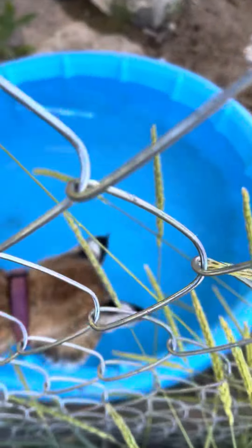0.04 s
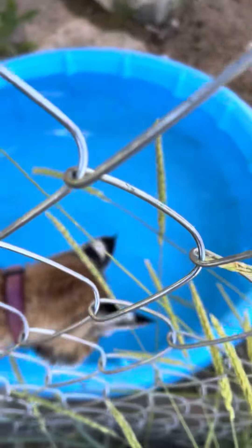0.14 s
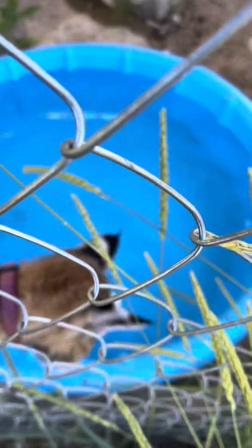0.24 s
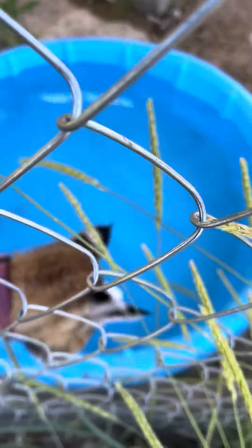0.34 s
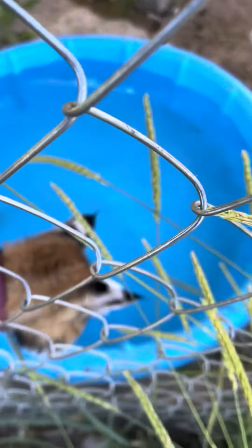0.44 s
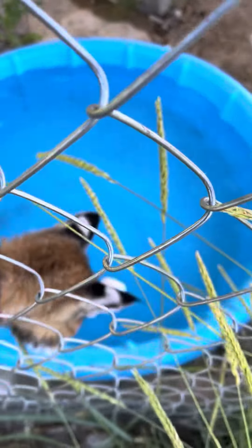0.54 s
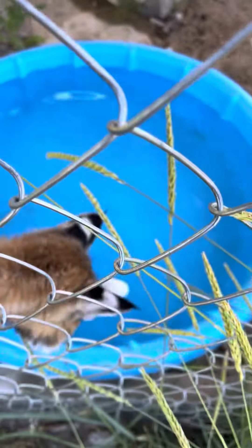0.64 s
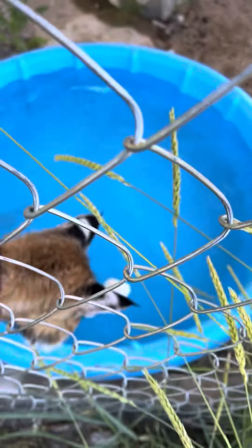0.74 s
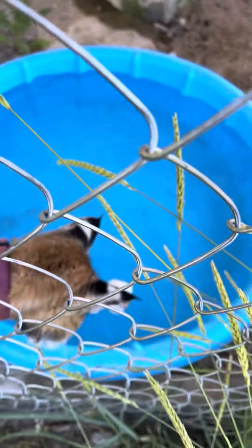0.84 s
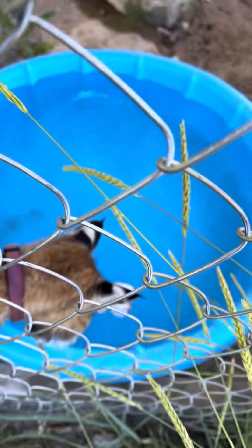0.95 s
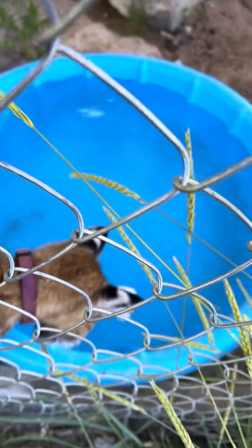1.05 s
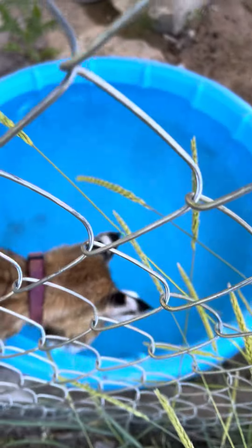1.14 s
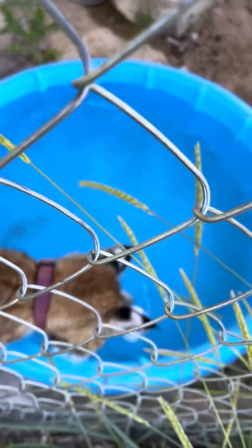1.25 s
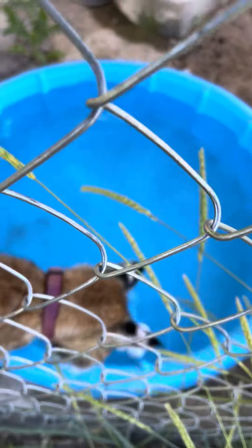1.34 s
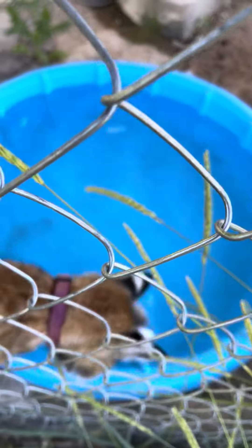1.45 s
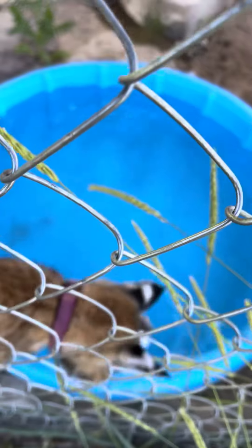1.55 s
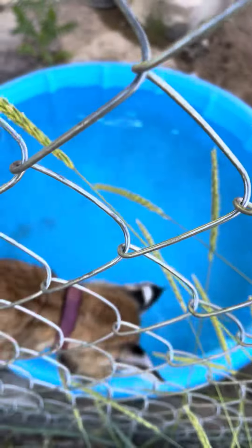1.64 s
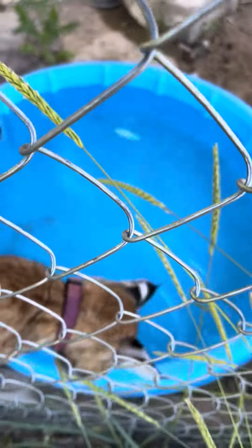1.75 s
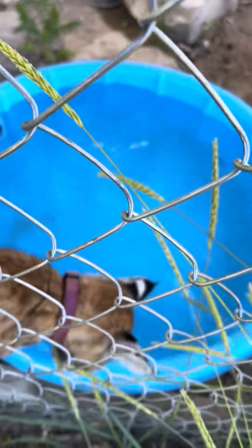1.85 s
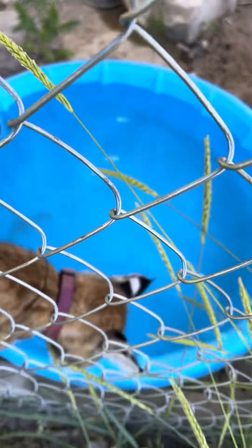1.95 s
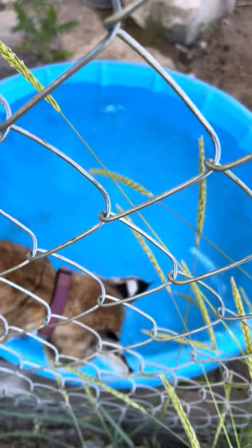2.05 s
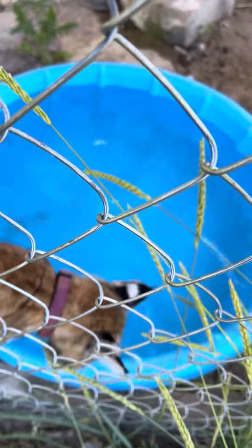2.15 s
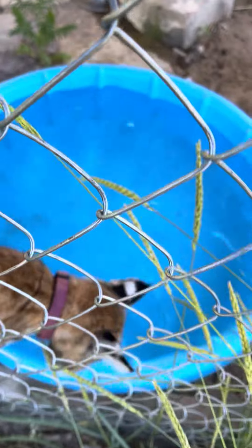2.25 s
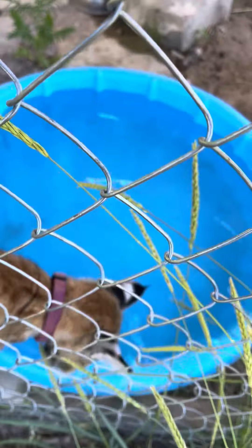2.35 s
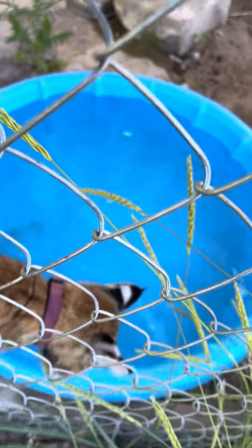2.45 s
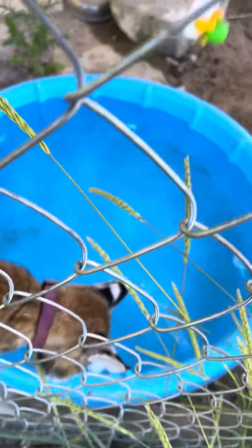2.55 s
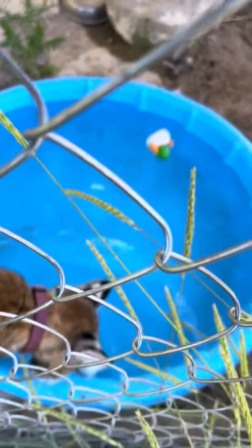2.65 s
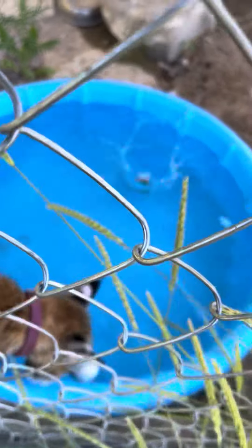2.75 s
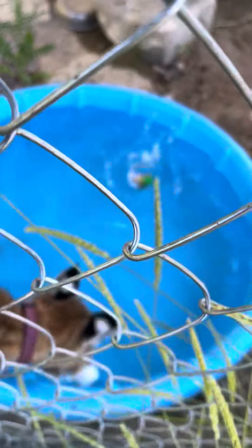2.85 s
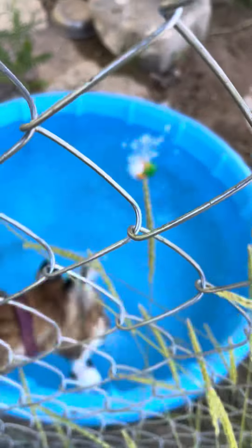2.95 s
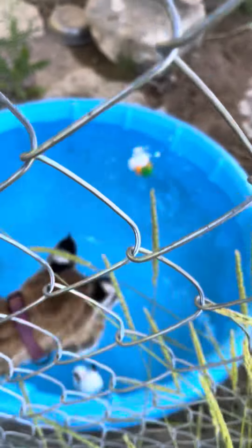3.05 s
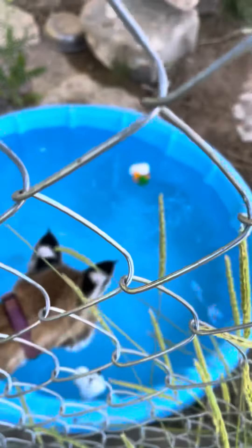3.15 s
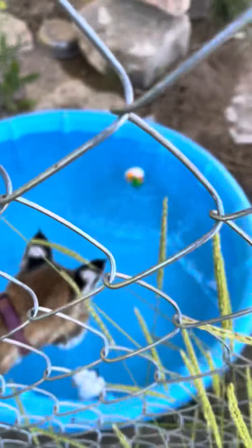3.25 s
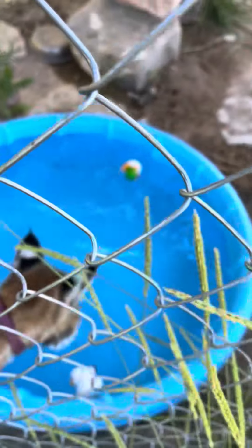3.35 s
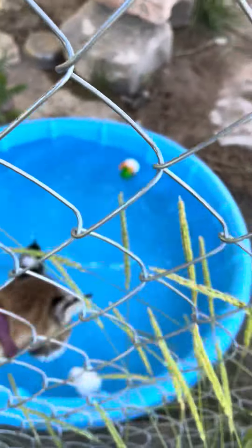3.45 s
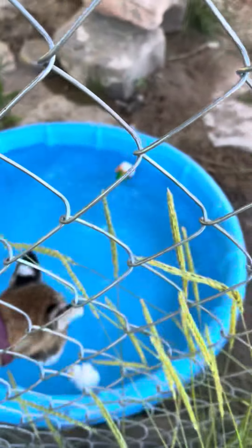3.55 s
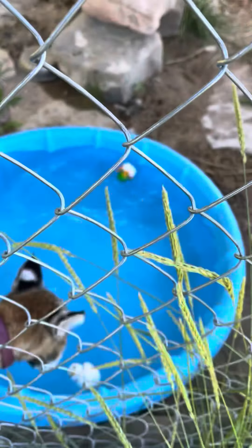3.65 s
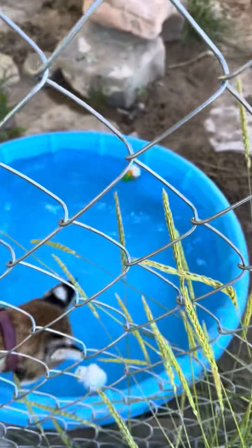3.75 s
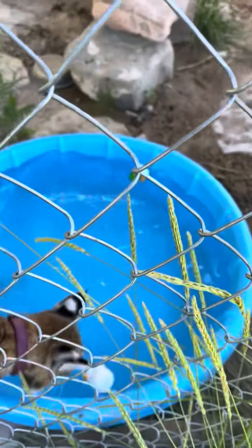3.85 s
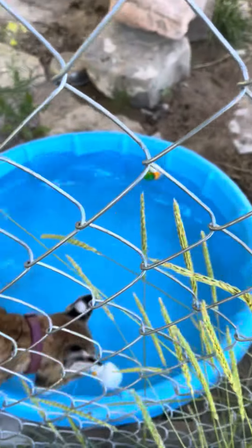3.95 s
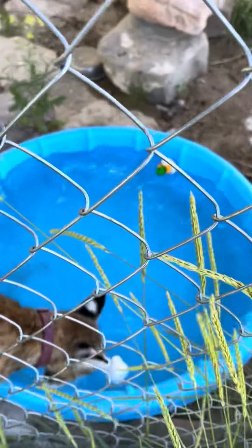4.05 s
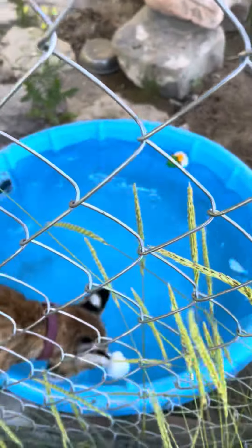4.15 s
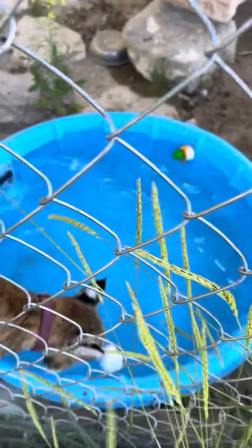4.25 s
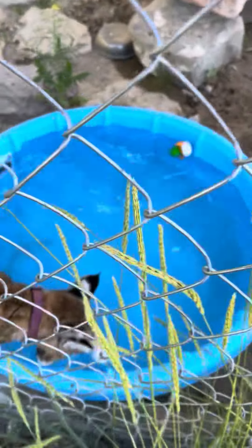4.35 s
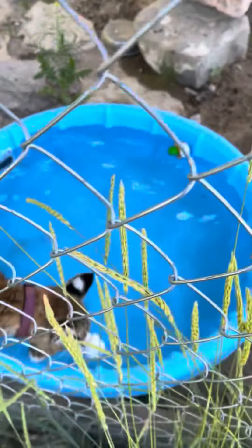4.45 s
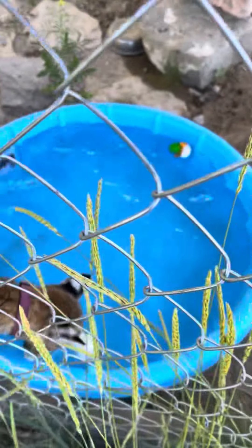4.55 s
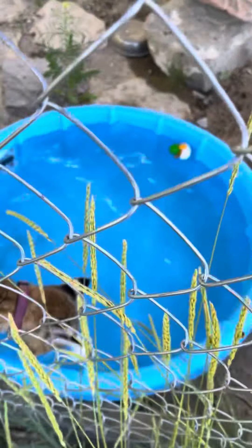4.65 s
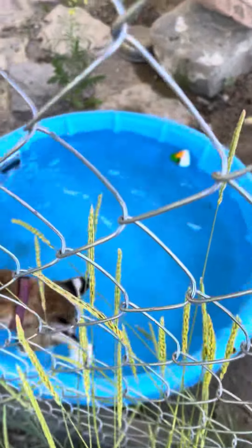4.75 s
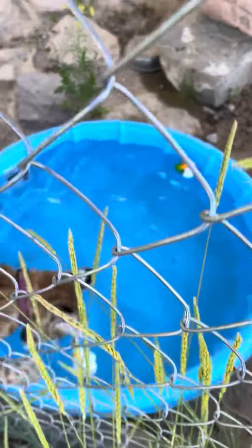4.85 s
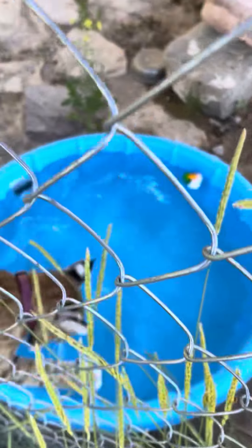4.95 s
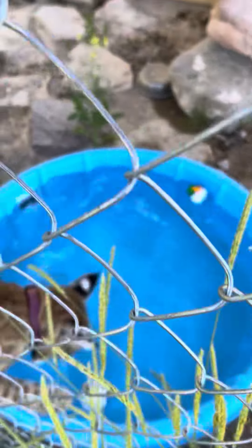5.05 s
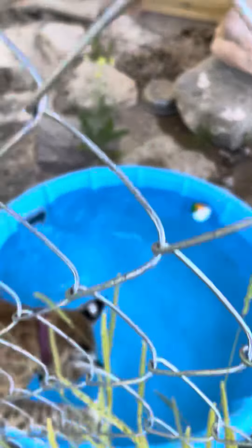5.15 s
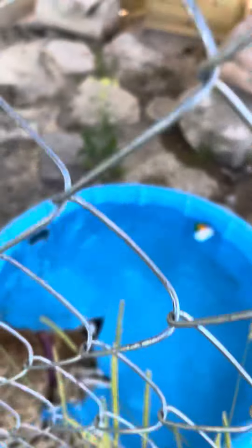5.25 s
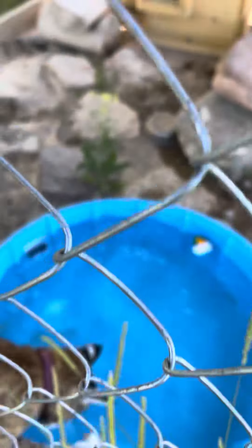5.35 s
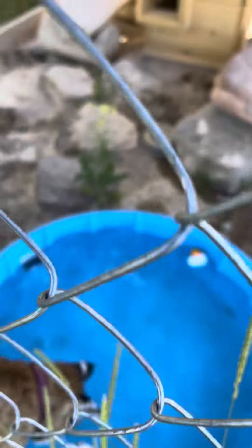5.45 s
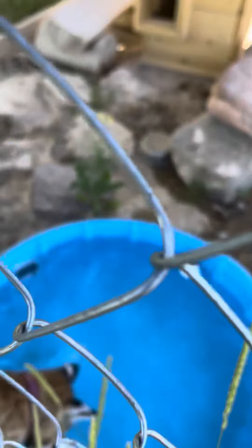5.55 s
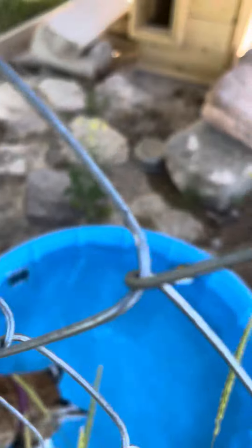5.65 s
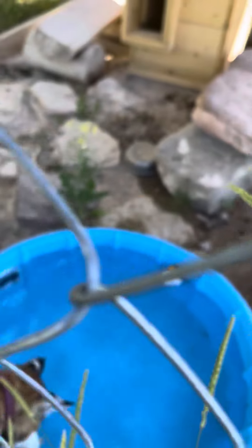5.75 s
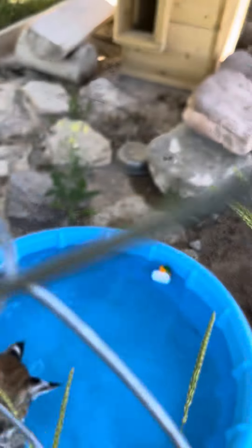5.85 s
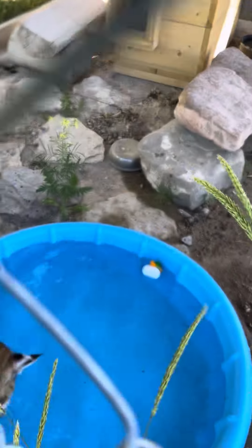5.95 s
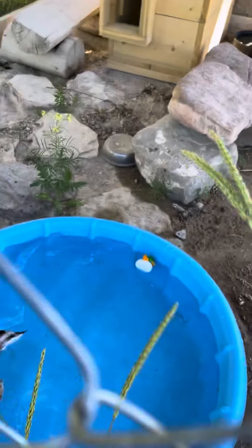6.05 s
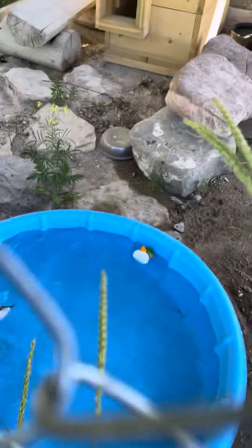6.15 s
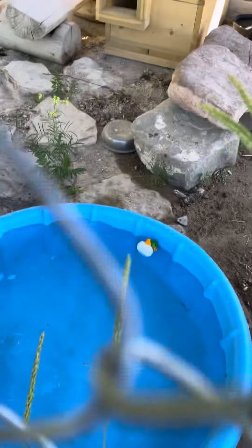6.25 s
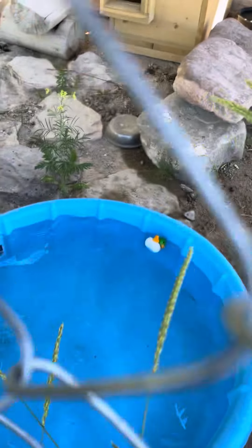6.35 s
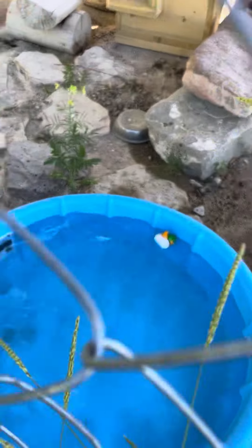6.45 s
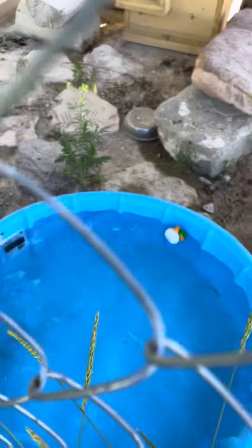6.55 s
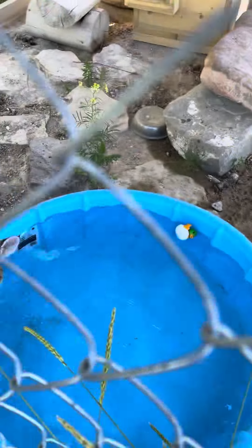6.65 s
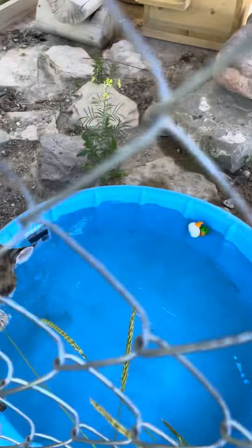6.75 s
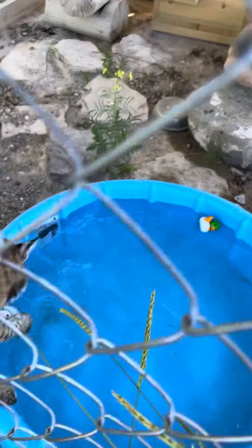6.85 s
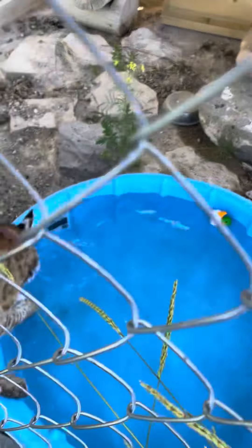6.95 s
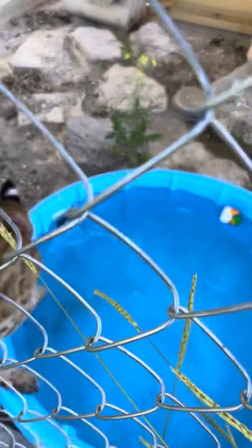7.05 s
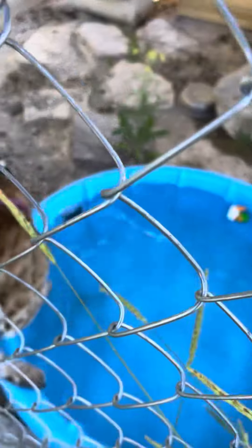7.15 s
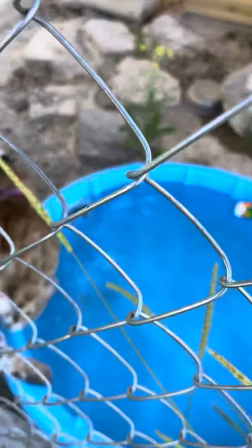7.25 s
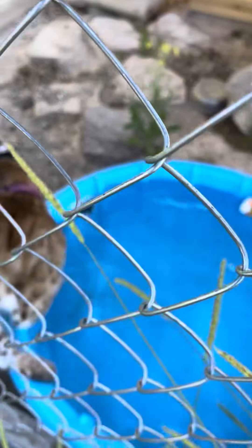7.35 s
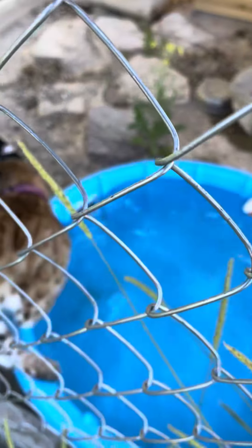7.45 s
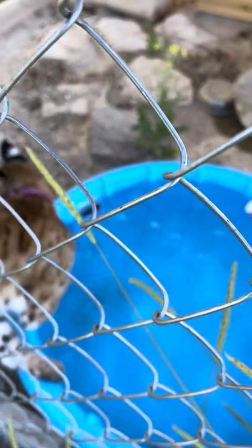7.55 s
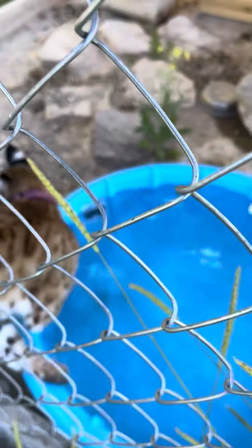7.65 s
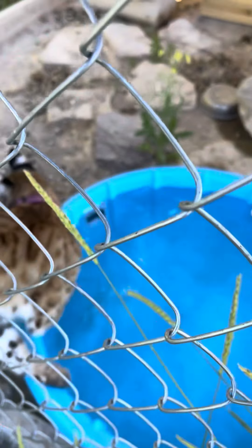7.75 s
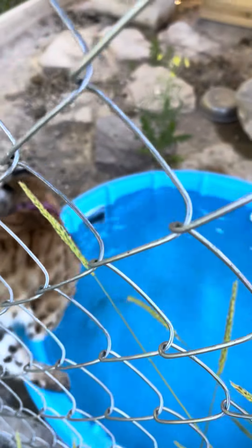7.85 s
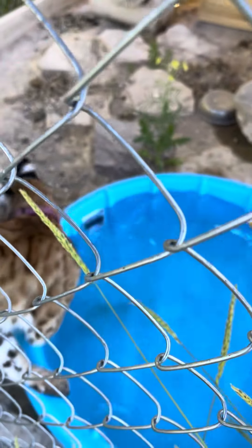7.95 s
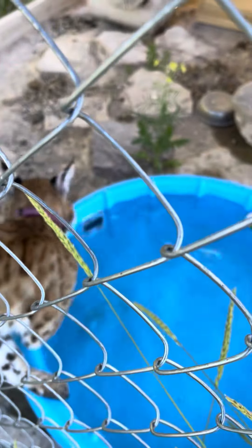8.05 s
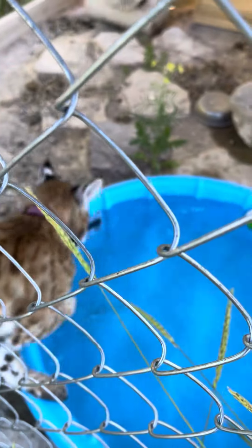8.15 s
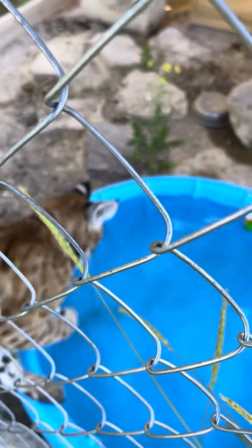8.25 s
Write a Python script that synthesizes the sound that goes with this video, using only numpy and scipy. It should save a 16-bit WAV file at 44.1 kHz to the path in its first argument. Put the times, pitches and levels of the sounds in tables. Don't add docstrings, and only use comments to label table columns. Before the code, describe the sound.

An animal's paws thump and splash unevenly in a shallow plastic tub, with one sharp knock on the water, over faint breeze and rumble.

```python
import sys
import numpy as np
from scipy import signal
from scipy.fft import rfft, irfft, next_fast_len
from scipy.io import wavfile
from scipy.ndimage import uniform_filter1d

SR = 44100
rng = np.random.default_rng(int(sys.argv[2]) if len(sys.argv) > 2 else 0)


def gain_from_decibels(decibels):
    exponent = np.asarray(decibels, float) / 20
    return 10 ** exponent


def to_wav(sig):
    pcm = np.clip(np.atleast_2d(sig), -1, 1) * 32767
    pcm = np.round(pcm).astype(np.int16)
    wavfile.write(sys.argv[1], SR, pcm.T)


N = 365588
TIME = np.arange(N) / SR


def rms_one(x):
    return x / np.sqrt(np.mean(x ** 2) + 1e-20)


def in_time(rows):
    s, db = np.transpose(rows)
    return np.interp(TIME, s, db)


def at_hz(points, hz):
    known_hz, db = np.transpose(points)
    return np.interp(np.log(hz), np.log(known_hz), db)


def drift(rate):
    r = np.exp(-80 * np.pi * rate / SR)
    white = rng.standard_normal(len(TIME[::40]) + 2000)
    settled = signal.lfilter([1], [1, -2 * r, r * r], white)[2000:]
    return rms_one(settled)


def band(x, low_hz, high_hz):
    return signal.sosfilt(signal.butter(2, [low_hz, high_hz], "band", fs=SR, output="sos"), x)


def resonate(x, hz, width):
    r = np.exp(-np.pi * width / SR)
    poles = [1, -2 * r * np.cos(2 * np.pi * hz / SR), r * r]
    return signal.lfilter(np.array([1, 0, -1]) * (1 - r * r) / 2, poles, x)


def add(out, s, piece):
    i = round(s * SR)
    out[i:i + len(piece)] += piece[:N - i]


def swell(s, hold, rise, fall):
    rising = 1 + (TIME - s) / rise
    falling = 1 + (s + hold - TIME) / fall
    return np.clip(np.minimum(rising, falling), 0, 1)


def bursts(times, db, t60, rise):
    out, t = np.zeros(N), TIME[:SR // 3]
    for s, level, long in zip(times, db, t60):
        add(out, s, gain_from_decibels(level - 60 * t / long) * (1 - np.exp(-t / rise)))
    return out


def bubble(hz, t60, climb):
    t = TIME[:round(t60 * SR)]
    ring = np.sin(2 * np.pi * hz * (t + climb * t * t / t60))
    return ring * gain_from_decibels(-60 * t / t60) * (1 - np.exp(-t * hz))


def banded_noise(spectrum, patchy_db, count, bright_db=0, dull_db=0):
    out, together = 0, drift(15.0) + 0.096 * drift(87.0)
    first_hz, last_hz = spectrum[0][0], spectrum[-1][0]
    edges = first_hz * 2 ** np.arange(0, np.log2(last_hz / first_hz) + .1, 1 / count)
    white = rng.standard_normal((2, 2, N))
    for k, (low, high) in enumerate(zip(edges, edges[1:])):
        hz = np.sqrt(low * high)
        tilt = np.log2(hz / 6000)
        lift = bright_db * np.clip(1.57 * tilt, 0, 1.6) + dull_db * np.clip(-1.4 * tilt, 0, 1)
        flicker_db = patchy_db * np.clip(1 - 0.48 * tilt, .5, .7) * (0.58 * together + drift(7.6))
        gain = gain_from_decibels(at_hz(spectrum, hz) + lift + flicker_db)
        out = out + np.interp(TIME, TIME[::40], gain) * band(white[k % 2], low, high)
    return out


def rumble():
    # (frequency [Hz], density [dB per Hz])
    rumble_spectrum = [(25, -25), (40, -8.5), (60, 1.5), (100, -5), (150, -8), (250, -26)]
    # (time [s], level [dB])
    far_level = [(0, -62), (0.4, -61.5), (1.2, -68.5), (2.9, -63), (3.5, -67), (4.45, -67), (5.5, -67),
                 (5.95, -74), (6.2, -57.5), (6.5, -65), (7.4, -70.5), (8.29, -70)]
    return gain_from_decibels(in_time(far_level) + 28.0) * banded_noise(rumble_spectrum, 2.8, count=2)


def lapping():
    # (frequency [Hz], density [dB per Hz])
    murmur_spectrum = [(70, -19), (130, -9), (250, -0.5), (450, -4), (800, -13.5), (1300, -19.5),
                       (2000, -36)]
    # (time [s], level [dB])
    wave_level = [(0, -61.5), (0.4, -67.5), (0.8, -57), (1.2, -71.5), (1.5, -57.5), (2.1, -61), (2.3, -62),
                  (2.6, -57.5), (4.0, -62.5), (4.4, -67), (4.7, -61), (5.5, -63), (5.75, -72), (6.2, -62),
                  (6.8, -62.5), (7.4, -72), (7.8, -72), (8.29, -64)]
    return gain_from_decibels(in_time(wave_level) + 16.5) * banded_noise(murmur_spectrum, 3.03, count=2)


def grass():
    # (frequency [Hz], density [dB per Hz])
    rustle_spectrum = [(500, -10.5), (1200, -8), (1700, -6), (2500, -5), (3600, -7), (4800, -3.5),
                       (6200, 1.5), (7400, -0.5), (9000, 3), (10500, 7.5), (12000, -11.5), (14000, -25.5),
                       (16000, -35.5)]
    # (time [s], hold [s], strength [dB], extra weight near 2 kHz [dB])
    gust_rows = [(0.173, 0.28, -6.5, -4), (0.733, 0.022, 2.5, 4.5), (1.582, 0.18, 6.5, 3.5),
                 (2.33, 0.89, 2, 5), (2.735, 0.55, 12.5, 3), (3.405, 0.095, 6, 5.5), (3.666, 0.38, 16.5, 7),
                 (4.44, 0.093, 6.5, -1.5), (4.159, 0.17, 11, 4.5), (4.603, 0.028, 5.5, 5.5),
                 (4.767, 0.19, 15.5, 8.5), (5.282, 0.018, -8.5, 7.5), (5.533, 0.051, 1.5, 3),
                 (6.046, 0.21, 16, 9.5), (6.345, 0.054, 13.5, 0), (6.504, 0.088, 14, 7.5),
                 (6.804, 0.09, 5, 5.5)]
    shapes = np.array([swell(s, hold, rise=0.22, fall=0.1) for s, hold, *_ in gust_rows])
    strength_db, extra_db = np.transpose(gust_rows)[2:]
    gust_db = (shapes * strength_db[:, None]).max(axis=0)
    weight_db = extra_db @ shapes
    rustle_db = -68.5 - 0.56 * TIME + 0.36 * gust_db
    bright_db = 0.88 * gust_db[::40] - 7.0
    colour = banded_noise(rustle_spectrum, 3.55, count=3, bright_db=bright_db, dull_db=weight_db[::40])
    return gain_from_decibels(rustle_db + 11.0) * colour


def fence():
    # (time [s], peak level [dB])
    twangs = [(0.015, -43), (0.185, -42.5), (0.241, -43.5), (0.294, -41), (0.341, -38.5), (0.396, -37.5),
              (0.448, -40.5), (0.501, -44), (0.548, -46), (0.594, -42.5), (0.649, -45.5)]
    out, t = np.zeros(N), TIME[:SR // 20]
    hz = 85 + 330 * np.exp(-t / 0.00563)
    swells_and_stops = (1 - np.exp(-t / .005)) * np.exp(-(t / .025) ** 4)
    chirp = np.sin(2 * np.pi * np.cumsum(hz) / SR) * swells_and_stops
    for s, db in twangs:
        add(out, s, gain_from_decibels(db - 3.0) * chirp)
    return out


def slosh():
    # (time [s], hold [s], level [dB])
    stirs = [(1.49, 0.0083, -39.5), (1.851, 0.012, -39.5), (2.124, 0.13, -55), (2.716, 0.0068, -29.5),
             (2.963, 0.2, -45.5), (3.18, 0.11, -49.5), (3.482, 0.021, -42.5), (5.453, 0.25, -57.5),
             (5.743, 0.045, -50), (6.084, 0.34, -46.5), (6.29, 0.13, -53.5), (6.508, 0.076, -41)]
    sizes = gain_from_decibels(3.6 * np.minimum(rng.exponential(1, N), 5)) * rng.choice([-1, 1], N)
    born = rng.random(N) < 1500 / SR
    dealt = rng.integers(0, 20, N)
    fizz = 0
    for k, hz in enumerate(np.geomspace(650, 2800, 20)):
        fizz = fizz + resonate(sizes * born * (dealt == k) + 1e-18, hz, hz / 3.9)
    level = sum(gain_from_decibels(db) * swell(s, hold, rise=0.065, fall=0.098) ** 3 for s, hold, db in stirs)
    return gain_from_decibels(-14.5) * level * rms_one(fizz)


def gurgle():
    # (start [s], length [s], level [dB], first pitch [Hz], last pitch [Hz])
    gurgles = [
        (4.086, 0.1, -58.5, 860, 820),
        (4.142, 0.06, -53.5, 553, 560),
        (4.189, 0.024, -52, 870, 696),
        (4.503, 0.065, -59, 558, 530),
        (6.151, 0.11, -35.5, 747, 708),
    ]
    out, struck, chance = np.zeros(N), rng.random(N) < 400 / SR, rng.standard_normal((2, N))
    for s, length, level_db, first_hz, last_hz in gurgles:
        hz = np.interp(TIME, [s, s + length], [first_hz, last_hz])
        shape = swell(s, length, rise=0.003, fall=0.012)
        for i in np.flatnonzero(struck & (shape > 0)):
            db = level_db + 2.0 - 25 * (1 - shape[i]) + 0.84 * chance[0, i]
            pitch = hz[i] * (1 + 0.07 * chance[1, i])
            add(out, i / SR, gain_from_decibels(db) * bubble(pitch, 24 / hz[i], 0.025))
    return out


def pockets():
    # (start [s], length [s], peak level [dB], first pitch [Hz], last pitch [Hz])
    pocket_rows = [(1.984, 0.015, -52, 1240, 1880), (3.126, 0.021, -49, 716, 940),
                   (3.186, 0.017, -52, 700, 680), (3.2, 0.019, -47, 1723, 1720),
                   (6.165, 0.027, -42, 740, 680), (6.191, .012, -35, 840, 778),
                   (6.204, 0.0074, -38, 800, 800), (6.224, 0.037, -36.5, 753, 686),
                   (6.384, .03, -45.5, 580, 540), (2.7166, .007, -32.5, 3882, 4095),
                   (6.875, 0.015, -49.5, 1160, 2580)]
    out = np.zeros(N)
    for s, length, db, first_hz, last_hz in pocket_rows:
        t = TIME[:round(length * SR)]
        cycles = t * (first_hz + (last_hz - first_hz) * t / length / 2)
        add(out, s, gain_from_decibels(db) * np.sin(np.pi * t / length) * np.sin(2 * np.pi * cycles))
    return out


def glides():
    glide_times = [1.497, 1.556, 1.741, 1.838, 2.703, 2.845, 2.868, 3.165, 6.25, 6.272, 6.36, 6.454, 6.645,
                   6.727, 6.954, 7.015]
    # (peak level [dB], first pitch [Hz], last pitch [Hz], ring t60 [s])
    glide_rows = [(-39, 800, 2000, 0.057), (-43, 2070, 2200, .018), (-28, 3910, 4200, 0.0082),
                  (-41, 2230, 2300, .015), (-13.5, 270, 220, .03), (-46, 1450, 1400, 0.026),
                  (-47.5, 1450, 1550, 0.027), (-37.5, 980, 1500, 0.028), (-41, 1400, 2600, .02),
                  (-37, 680, 760, 0.033), (-39, 590, 680, 0.12), (-25.5, 1640, 1100, 0.027),
                  (-41.5, 1660, 2100, 0.032), (-36, 1800, 1600, 0.027), (-46.5, 2300, 2300, 0.12),
                  (-42, 1320, 1000, 0.0043)]
    out = np.zeros(N)
    for s, (db, first_hz, last_hz, t60) in zip(glide_times, glide_rows):
        add(out, s, gain_from_decibels(db) * bubble(first_hz, t60, (last_hz / first_hz - 1) / 2))
    flutter_db = 5.5 * np.interp(TIME, TIME[::40], drift(90.0))
    return out * gain_from_decibels(flutter_db - 3.5)


def pings():
    # (time [s], peak level [dB], pitch [Hz])
    ping_rows = [(1.4645, -40, 1310), (1.4645, -40, 2250), (1.474, -39, 1100), (1.493, -36, 1100),
                 (1.499, -32, 1720), (1.521, -48, 2180), (1.558, -39, 2100), (1.559, -33, 1660),
                 (1.596, -42, 1480), (1.742, -43, 3350), (1.742, -36, 4580), (1.787, -40, 1900),
                 (1.842, -44, 2250), (1.856, -40, 2270), (1.862, -50, 1800), (1.872, -43, 1020),
                 (1.881, -32, 1610), (1.881, -40, 3520), (1.891, -31, 860), (1.909, -43, 840),
                 (1.933, -39, 1900), (1.933, -49, 2540), (1.966, -58, 1500), (1.983, -44, 1710),
                 (2.0, -40, 1680), (2.039, -38.5, 1720), (2.058, -43, 1900), (2.107, -43, 2380),
                 (3.069, -43, 3700), (3.075, -41, 2980), (3.076, -40, 5500), (3.09, -47, 2200),
                 (3.107, -41, 3200), (3.133, -45, 4500), (3.178, -36, 4250), (3.184, -36, 6400),
                 (3.184, -49, 3000), (3.196, -45, 2850), (3.209, -42, 3000), (3.247, -37, 4500),
                 (3.273, -28, 6360), (3.273, -37, 3300), (5.7238, -25.5, 5800), (5.729, -43, 8100),
                 (5.733, -46, 2250), (5.738, -41, 2420), (5.743, -37, 6300), (5.752, -37, 3950),
                 (5.757, -41, 6440), (5.7705, -43, 6070), (5.776, -51.5, 2500), (5.783, -48, 2240),
                 (6.157, -33, 1810), (6.172, -45, 1850), (6.225, -37, 1500), (6.252, -37, 1900),
                 (6.293, -40, 1140), (6.311, -34, 930), (6.378, -39, 1690), (6.387, -36, 2250),
                 (2.983, -46.5, 3300),
        (5.407, -52, 2220),
        (5.471, -46, 3220),
        (5.645, -44, 4450),
        (5.694, -53, 2290),
        (6.291, -39, 3540),
    ]
    out = np.zeros(N)
    for s, db, hz in ping_rows:
        t60 = 0.017 * (hz / 1000) ** -0.49
        add(out, s, gain_from_decibels(db) * bubble(hz, t60, climb=0.045))
    return out


def ticks():
    # (time [s], level at 7.6-13.8 kHz [dB], share at 4.2-8.8 kHz [dB])
    tick_rows = [(2.7576, -38, -20), (2.776, -57, -10), (2.785, -41, -7), (2.799, -30, -3),
                 (2.8664, -44, -7), (2.8814, -49, -2), (2.918, -35.5, -18), (2.9226, -38, -3),
                 (2.9816, -49, 6), (2.994, -48, 10), (3.0204, -47, -7), (3.0676, -44, -8),
                 (3.0744, -45, -5), (3.0935, -45, -6), (3.1314, -50, 6), (3.1512, -48, -4),
                 (3.184, -44, -4), (3.2415, -53, -8), (3.273, -34, -8), (5.4922, -49, -19),
                 (5.5822, -64, -4), (5.5967, -61, 1), (5.6351, -65.5, 10), (5.728, -55, -6),
                 (5.7377, -44.5, 5.5), (5.8606, -72, 0), (5.886, -58, -5), (6.0226, -44.5, -1),
                 (6.1556, -43, -9), (6.3086, -53, -3), (6.377, -39, -21), (6.4642, -56, -5),
                 (6.4775, -43, -12), (6.535, -41, -19), (6.717, -55, -7), (6.841, -56, -10)]
    s, db, share_db = np.transpose(tick_rows)
    noise, t60 = rng.standard_normal(N), np.full(len(s), 0.012)
    treble = band(noise * bursts(s, db + 11.5, t60, 0.00016), 7600, 13800)
    middle = band(noise * bursts(s, db + share_db + 6.0, t60, 0.0002), 4200, 8800)
    return treble + middle


def drops(rows, ring):
    out, chance = np.zeros(N), rng.random((len(rows), 9))
    spatter, t = rng.standard_normal((len(rows), SR // 10)), TIME[:SR // 10]
    for (s, db, hz), (climb, *near), noise in zip(rows, chance, spatter):
        t60 = ring * (hz / 1000) ** -0.11
        add(out, s, gain_from_decibels(db - 3) * bubble(hz, t60, 0.13 * climb))
        broad = resonate(resonate(noise, 1.51 * hz, 1.2 * hz), 1.51 * hz, 1.2 * hz)
        add(out, s, gain_from_decibels(db - 6.0 - 60 * t / (1.2 * t60)) * broad)
        narrow = resonate(noise[::-1], 1.02 * hz, 0.15 * hz)
        add(out, s, gain_from_decibels(db - 1.5 - 60 * t / (4.4 * t60)) * narrow)
        for pitch, late in zip(near[:4], near[4:]):
            small = bubble(hz * (.7 + .9 * pitch), .5 * t60, 0.072)
            add(out, s + 0.03 * late ** 2, gain_from_decibels(db - 22) * small)
    return out


def drips():
    # (time [s], peak level [dB], pitch [Hz])
    plops = [(1.397, -30, 1060), (1.464, -36, 3020), (1.559, -31.5, 1310), (1.602, -29, 1150),
             (1.738, -30.5, 916), (1.811, -40.5, 3180), (1.836, -24.5, 820), (1.934, -31.5, 1010),
             (2.062, -34, 1050), (2.829, -32.5, 3160), (2.88, -34.5, 3800), (2.944, -33, 1700),
             (3.099, -34, 3560), (5.604, -48, 2550), (3.149, -34.5, 2150), (3.172, -27, 1240),
             (3.272, -25, 1640), (4.115, -23.5, 810), (5.311, -38, 2600), (5.373, -41.5, 4070),
             (5.501, -42, 3670), (5.7252, -23.5, 2330), (5.888, -44, 1780), (5.941, -35, 4300),
             (6.071, -35, 1280), (6.385, -32.5, 1860), (6.455, -11, 820), (6.534, -17.5, 1004),
             (6.712, -28.5, 735), (6.859, -37, 1270)]
    # (time [s], peak level [dB], pitch [Hz])
    ringing = [(1.497, -32, 1000), (1.686, -43, 1460), (1.786, -38.5, 1080), (1.88, -29.5, 930),
               (2.038, -38.5, 1090), (2.107, -34, 1060), (2.798, -35, 2250), (2.922, -35, 2640),
               (3.068, -36, 1510), (3.205, -42, 1700), (3.479, -35, 1176), (4.079, -46.5, 850),
               (5.837, -47, 820), (6.004, -44, 3200), (2.81, -37, 2800), (6.093, -45, 1000),
               (6.22, -41, 2120), (6.155, -22, 820), (6.305, -33.5, 1670), (6.337, -36.5, 985),
               (6.359, -36.5, 2270), (6.559, -35.5, 2120), (6.607, -39.5, 3080), (6.687, -43.5, 1970),
               (6.726, -37.5, 810), (1.518, -43, 2070), (6.954, -41.5, 2090), (5.625, -51, 2270)]
    # (time [s], peak level [dB], pitch [Hz])
    singers = [
        (3.126, -50, 700),
        (3.242, -35, 1586),
        (4.51, -51, 847),
        (5.602, -57, 1180),
        (5.768, -43.5, 2330),
        (5.98, -51.5, 1220),
        (7.016, -51.5, 850),
        (6.023, -36.5, 890),
        (6.139, -40, 1290),
        (6.917, -35, 726),
    ]
    return drops(plops, ring=0.015) + drops(ringing, ring=0.037) + drops(singers, ring=0.079)


def spray():
    # (time [s], peak level [dB], brightness [dB])
    snaps = [(0.322, -40, 19), (0.4632, -37, 9), (1.464, -45.5, -23), (1.642, -37.5, 29), (1.869, -36, 25),
             (1.736, -50.5, -31), (1.8781, -29.5, 20), (2.7024, -8.5, -7), (2.758, -42, 35),
             (2.798, -18.5, -11.5), (2.874, -30, 17), (2.9183, -18.5, 12), (3.0009, -25, -6),
             (3.0618, -20.5, 9), (3.161, -34, 10), (3.1778, -37, 20), (3.2729, -28.5, 18),
             (3.482, -33, -13), (3.475, -44, -26), (1.492, -50, -29), (4.351, -37.5, -8), (4.311, -53, 6),
             (5.7183, -34, 9), (5.7256, -24, 0), (5.9833, -41, 9), (6.0672, -30, 20), (6.089, -34, 20),
             (6.155, -37, 0), (6.556, -34.5, 35), (6.6048, -51, -25.5), (6.9707, -38, -12)]
    s, db, bright_db = np.transpose(snaps)
    shares = ((-11.5 - bright_db, 1500, 4600),
              (4.0, 4900, 8300),
              (-16.5 + bright_db, 9500, 13000))
    noise, out = rng.standard_normal(N), 0
    for share_db, low_hz, high_hz in shares:
        crack = bursts(s, db + share_db, np.full(len(s), .009), 0.00024)
        patter = bursts(s, db + share_db - 15.0, np.full(len(s), .09), 0.0085)
        out = out + band(noise * (crack + patter), low_hz, high_hz)
    return out


def tub():
    # (time [s], peak level [dB], ring t60 [s], slap share [dB], strongest floor tone [Hz])
    thumps = [(1.396, -36, 0.28, -16, 237), (1.604, -33, 0.2, -11.5, 227), (1.686, -40, 0.27, -13, 420),
              (1.787, -41.5, 0.12, -9, 272), (1.879, -44, 0.2, -3, 410), (1.931, -36.5, 0.29, -31, 398),
              (2.037, -38, 0.27, -19, 337), (2.105, -38.5, 0.21, -19, 403),
              (2.701, -25.5, 0.048, -8.5, 210), (2.757, -35.5, 0.077, -28, 221),
              (3.475, -45, 0.36, -6, 333), (6.154, -22, 0.05, -17, 321), (6.158, -41.5, 0.58, -25, 171),
              (6.455, -17.5, 0.16, -11, 247), (6.458, -38, 0.25, -33, 165), (6.475, -41, 0.54, -1, 230),
              (6.533, -38.5, 0.16, 3.5, 204), (6.633, -45.5, 0.32, -11.5, 313),
              (6.661, -55.5, 0.98, 0, 475), (6.726, -42.5, 0.15, -1.5, 291), (6.743, -41.5, 0.027, -9, 297),
              (6.917, -31.5, 0.18, -7.5, 277), (6.931, -34, 0.23, -42, 307), (7.016, -37.5, 0.2, -17, 317),
              (8.129, -43.5, 0.18, -14, 296)]
    # (frequency [Hz], width [Hz], level [dB])
    floor_modes = [(178.6, 27, 2), (237, 10, 5.5), (317, 52, 2.5), (389, 13, 1), (420, 42, -3),
                   (540, 200, -15.5)]
    s, db, t60, slap_db, hz = np.transpose(thumps)
    drive = rng.standard_normal(N) * bursts(s, db, t60, 0.0025)
    body = np.zeros(N)
    for k, (f, width, level) in enumerate(floor_modes):
        body += gain_from_decibels(13.0 + level) * (-1) ** k * resonate(drive, f, width)
    for at, level, long, tone in zip(s, db, t60, hz):
        add(body, at, -gain_from_decibels(level + 3) * bubble(tone, 0.39 * long, -0.022))
        add(body, at, gain_from_decibels(level - 13.5) * bubble(110, 0.16, 0))
    slap = band(rng.standard_normal(N) * bursts(s, db + slap_db, .5 * t60, 0.00019), 500, 1300)
    return body + gain_from_decibels(13.0) * slap


def smack():
    # (time [s], level [dB])
    contacts = [
        (2.7005, -22),
        (2.7015, -21),
        (2.7027, -2),
        (2.7037, -15),
        (2.7047, -15),
        (2.7082, -23),
    ]
    # (frequency [Hz], level [dB], ring t60 [s])
    shell_modes = [(1410, -12, 0.015), (2250, -11.5, 0.019), (3300, 8.5, 0.0031), (4370, 1.5, 0.0058),
                   (5700, 4, 0.0032), (7134, -9, 0.003), (10460, 0, 0.005)]
    out, t = np.zeros(N), TIME[:SR // 20]
    shell = 0
    for k, (hz, level, t60) in enumerate(shell_modes):
        shell = shell + (-1) ** k * gain_from_decibels(level - 60 * t / t60) * np.sin(2 * np.pi * hz * t)
    click = -shell * (1 - np.exp(-t / .0002))
    for s, db in contacts:
        add(out, s, gain_from_decibels(db - 7.0) * click)
    hiss_shape = bursts([contacts[0][0], contacts[-1][0]], [-26, -34], [.04, .2], 0.001)
    hiss = rng.standard_normal(N) * hiss_shape
    return out + band(hiss, 1300, 10000) + gain_from_decibels(-16.0) * band(hiss, 8000, 15000)


def ports(same, other):
    # (frequency [Hz], phase [half turns])
    port_phase = [(0, 0), (1900, 0), (2900, .3), (4200, .3), (4500, .47), (4900, 1), (5250, 1.55),
                  (5750, 1.94), (6500, 2.06), (8350, 2.93), (9600, 3.04), (11900, 3.9), (13500, 4.2),
                  (15500, 4.9)]
    # (frequency [Hz], level [dB])
    port_balance = [(60, -1), (200, -3), (380, -4), (700, -2.5), (1290, -.5), (1700, 0)]
    # (frequency [Hz], share [dB])
    unlike = [(60, -22), (170, -9), (300, -5), (1200, -2), (1650, -22), (2000, -20), (2600, -9), (4000, -9),
              (4700, -15), (9300, -34), (11500, -10)]
    # (frequency [Hz], gain [dB])
    response = [(7000, -0.5), (9000, 1.5), (10200, 2), (11500, 1), (12500, -8), (13300, -11), (16000, -11)]
    size = next_fast_len(N + 4096)
    hz = np.maximum(np.arange(size // 2 + 1) * SR / size, 1)
    turn = np.exp(-1j * np.pi * np.interp(hz, *np.transpose(port_phase)))
    lean = gain_from_decibels(at_hz(port_balance, hz) / 2)
    colour = gain_from_decibels(at_hz(response, hz))
    common = rfft(same, size) * colour
    apart = rfft(other, size) * gain_from_decibels(at_hz(unlike, hz)) * colour
    left, right = (common + apart) * lean, (common - apart) * turn / lean
    return irfft(np.array([left, right]), size)[:, :N]


def treble_dropouts(dry, floor_db):
    mid_side = [dry[0] + dry[1], dry[0] - dry[1]]
    hz, _, cells = signal.stft(mid_side, SR, nperseg=1024)
    power = uniform_filter1d(np.abs(cells[:, :512]) ** 2, size=16, axis=1)[:, 8::16]
    patch_hz = hz[8:512:16, None]
    limit_db = floor_db + np.clip(np.abs(patch_hz - 11100) - 500, 0, 1500) / 220
    limit_db = limit_db + 3 * (patch_hz > 12800)
    limit_db = limit_db + 6 * uniform_filter1d(rng.standard_normal(power.shape), size=3, axis=2)
    faint = np.repeat(power < gain_from_decibels(2 * limit_db), 16, axis=1) & (hz[:512, None] > 9600)
    cells[:, :512][faint] = 0
    notch = uniform_filter1d(np.mean(np.abs(cells[0, 110:117]) ** 2, axis=0), size=3)
    weak = notch < np.quantile(notch, .96)
    chosen = uniform_filter1d(limit_db[0, 16], size=5) > limit_db[0, 16].mean()
    cells[0, 109:118, weak & chosen] = 0
    both, apart = signal.istft(cells, SR, nperseg=1024)[1][:, :N]
    return np.array([both + apart, both - apart]) / 2


def scene():
    same, other = rumble() + lapping() + grass()
    air = gurgle() + slosh() + glides() + pockets()
    water = drips() + pings() + ticks() + spray()
    pool = air + water + tub() + smack()
    wall = gain_from_decibels(-5.5) * band(np.roll(pool, round(0.0026 * SR)), 500, 13000)
    return ports(same + fence() + pool, other + wall)


def band_limit(x):
    return signal.sosfilt(signal.butter(12, 16350, fs=SR, output="sos"), x)


def record(dry):
    faded = signal.sosfilt(signal.butter(2, 13500, fs=SR, output="sos"), dry)
    mix = treble_dropouts(faded, floor_db=-99)
    return band_limit(mix)


dry = scene()
out = record(dry)
to_wav(out)
```